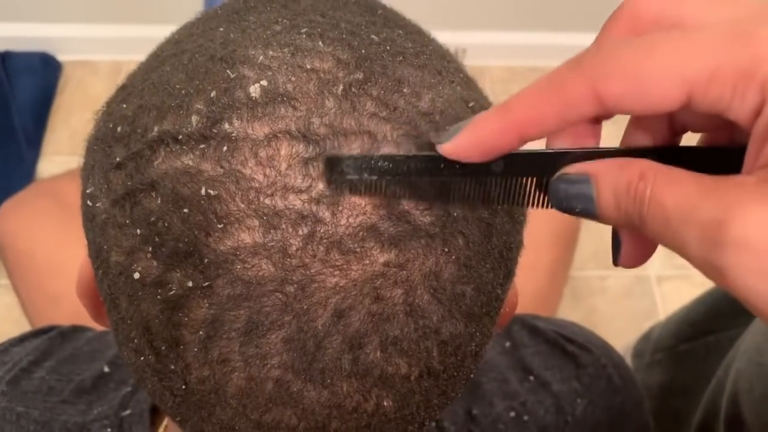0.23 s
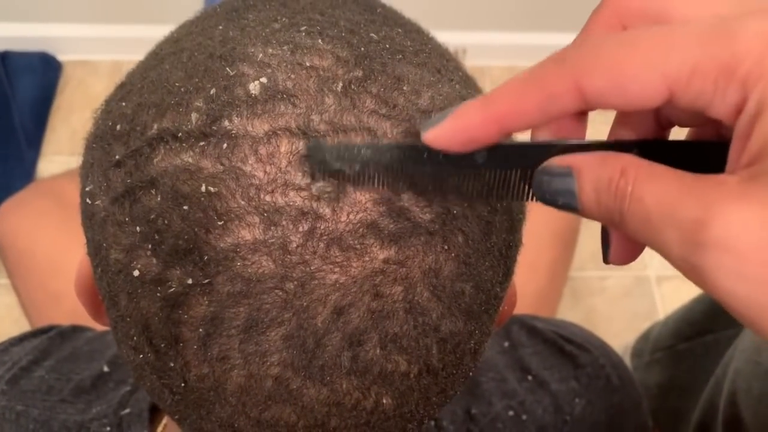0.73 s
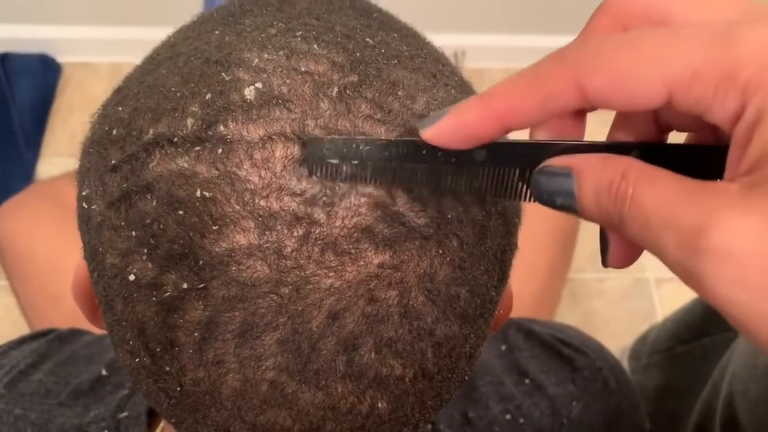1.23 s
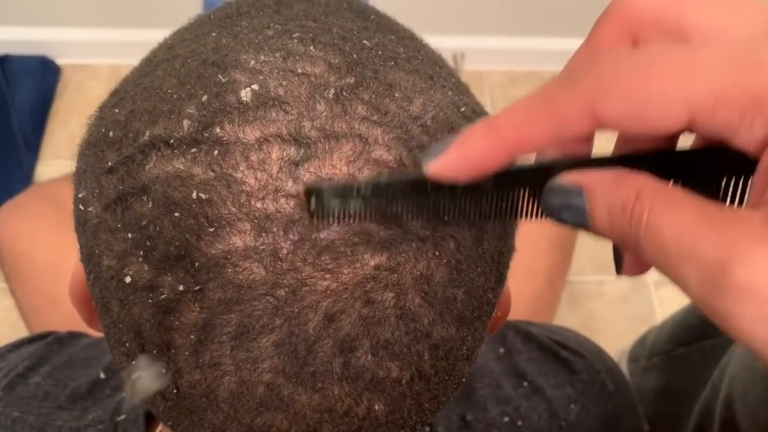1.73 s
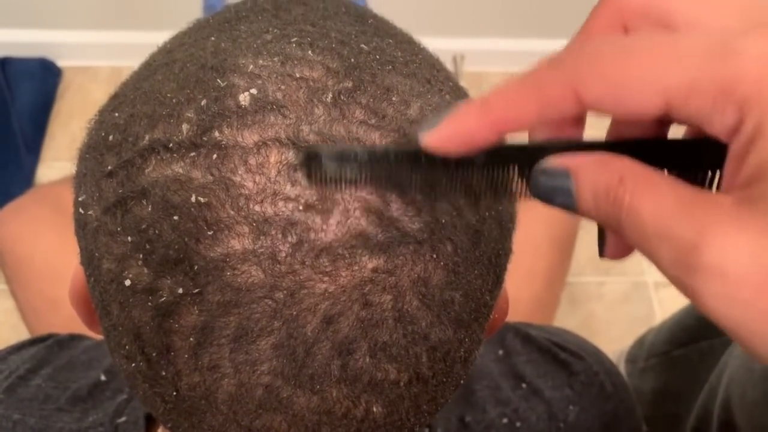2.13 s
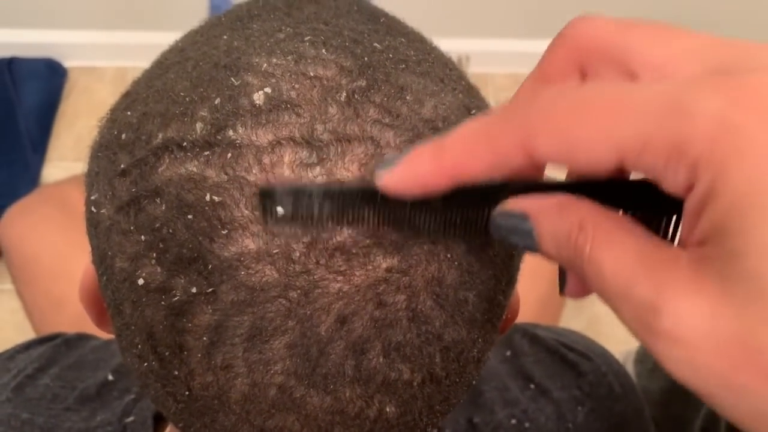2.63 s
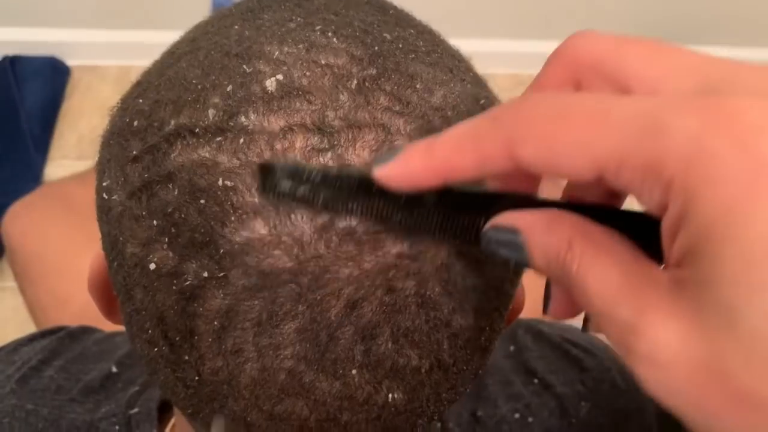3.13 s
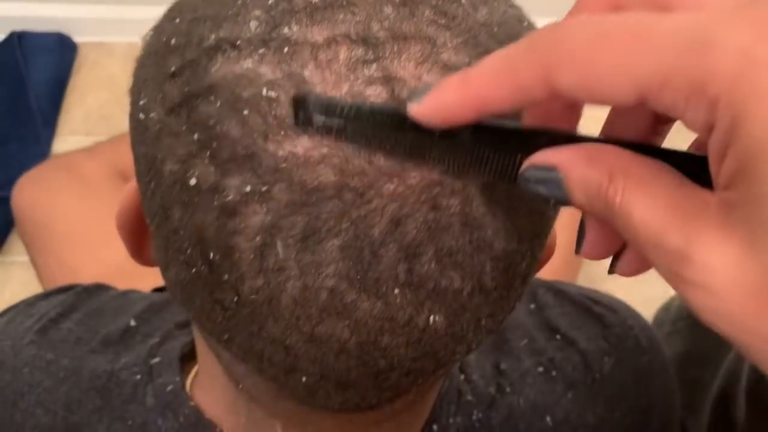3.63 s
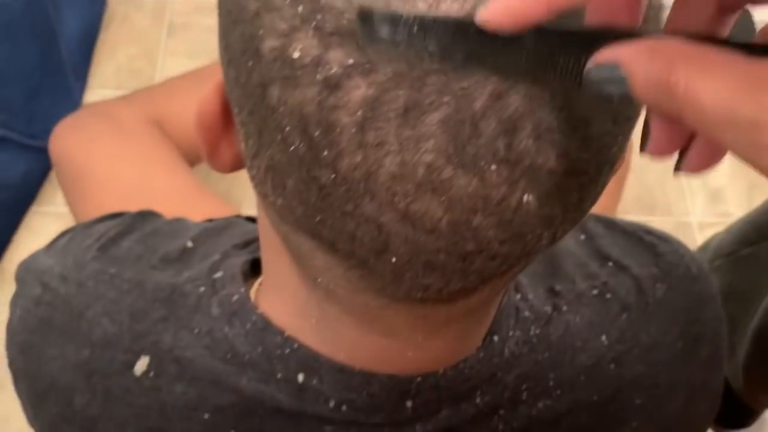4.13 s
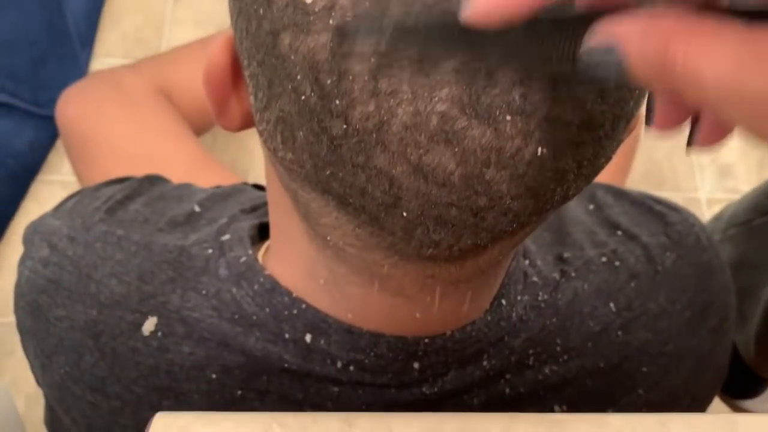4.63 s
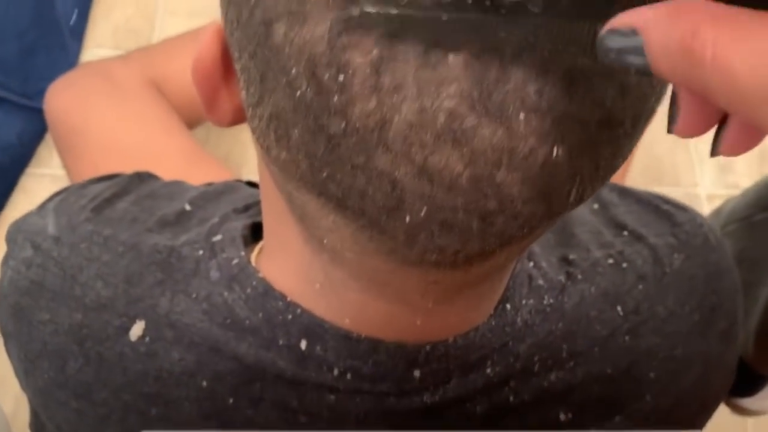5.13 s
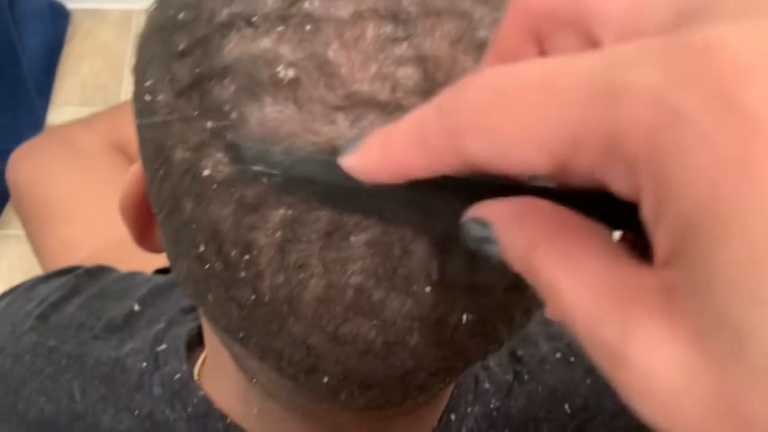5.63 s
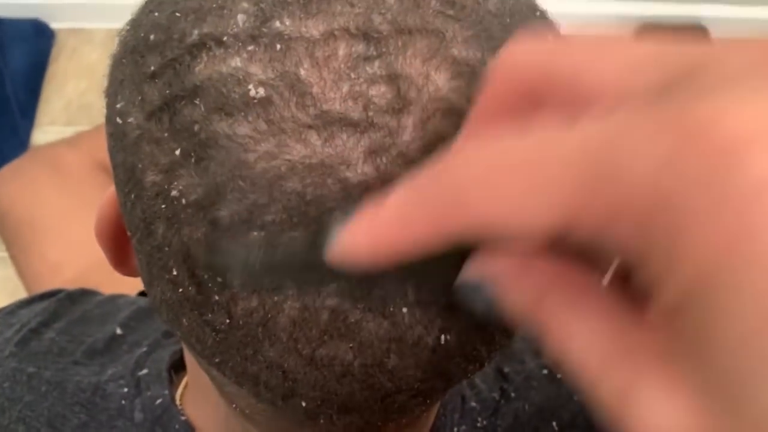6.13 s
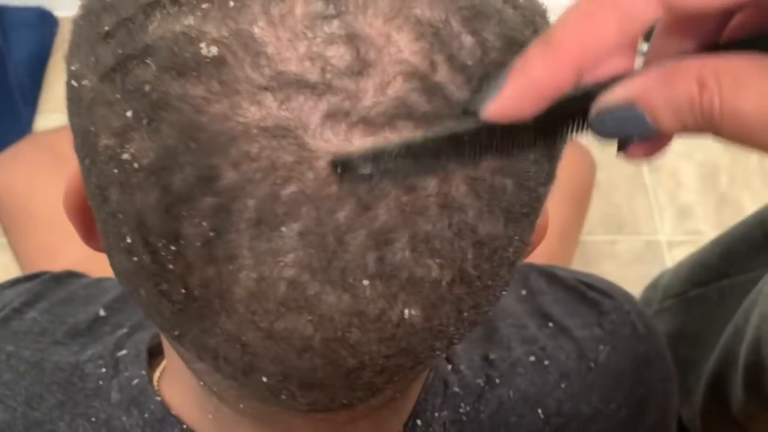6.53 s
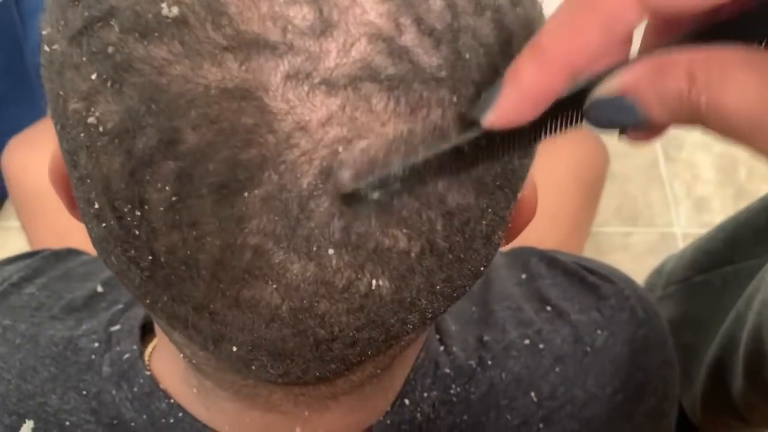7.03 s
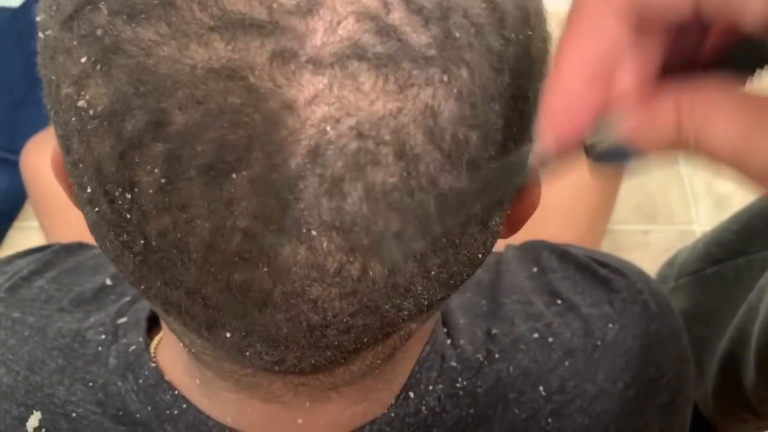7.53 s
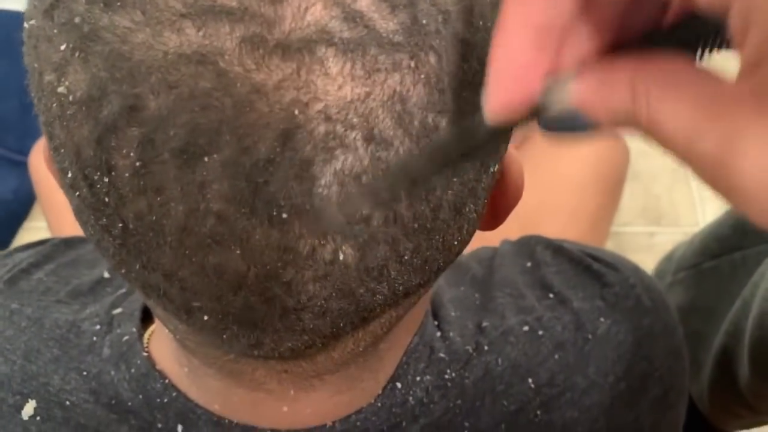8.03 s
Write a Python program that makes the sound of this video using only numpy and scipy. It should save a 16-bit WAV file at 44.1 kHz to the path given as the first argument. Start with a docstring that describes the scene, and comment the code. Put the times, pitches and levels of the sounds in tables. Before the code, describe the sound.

Indoors, a deep steady ventilation rumble with faint hiss lies under a very close, dry stereo pickup of a plastic fine-tooth comb in short coily hair. From 0 to 0.9 s the comb makes faint, light flicks with tiny ticks. Between 0.9 and 1.6 s these gather into sharp, snappy crackling as coils catch, with a dull finger knock on the microphone near 1.3 s. After a short lull, strokes resume at 1.9 s, and from 2.2 s become brisk, thin rasps, each about a tenth of a second, made of dense bright clicks. Soft hollow knocks cluster at 3.3 to 3.5 s. Cloth swishes faintly around 4.5 s; small dull scrapes and hard ticks come near 5.2 s. At 6.2 s a longer scratch mixes with soft cloth, then a knock at 6.4 s. Lighter, less ticky strokes continue, more spaced, until about 8.2 s.

```python
"""A plastic fine-tooth comb scratches in quick strokes through dry hair, close to a hand-held two-port microphone.
Hairs slip off the teeth as dense tiny clicks that ring modes of comb and scalp; catches and sharp ticks stand out.
Fingers knock softly on the microphone body as swelling, sagging tones; short dull scrapes and cloth swishes
are shaped noise. Behind them, ventilation rumbles through low room resonances under a faint hiss."""
import sys
import numpy as np
from scipy import signal
from scipy.fft import rfft, irfft, next_fast_len
from scipy.io import wavfile

SR = 44100
rng = np.random.default_rng(int(sys.argv[2]) if len(sys.argv) > 2 else 0)


def int16_out(signal):
    """Quantize to a 16-bit WAV file."""
    q = np.round(np.clip(np.atleast_2d(signal).T, -1, 1) * 32767)
    wavfile.write(sys.argv[1], SR, q.astype(np.int16))


N = 364707
LONG = next_fast_len(N + SR // 4)   # length with spare room for work on the spectrum
HZ = np.maximum(np.fft.rfftfreq(LONG, 1 / SR), 1)
CONTROL = np.arange(0, N + 32, 32) / SR   # times in s at which movements are worked out


def from_db(db):
    """Decibels to gain."""
    return 10 ** (np.asarray(db) / 20)


def rms_one(x):
    """Scale to rms 1."""
    return x / np.sqrt(np.mean(x ** 2) + 1e-20)


def at_hz(points):
    """Second column of a table, read over log frequency."""
    points = np.array(points)
    return np.interp(np.log(HZ), np.log(points[:, 0]), points[:, 1])


def drift(rate_hz):
    """Slow chance: noise at every 32nd sample through a double one-pole low-pass; spread 1."""
    r = np.exp(-64 * np.pi * rate_hz / SR)
    raw = rng.standard_normal(N // 32 + 2002)
    slow = signal.lfilter([1], [1, -2 * r, r * r], raw)[2000:]   # the run-in is dropped
    return np.interp(np.arange(N) / 32, np.arange(len(slow)), rms_one(slow))


def noise(gain):
    """Two unrelated noises with the given gain per frequency; rms 1."""
    spectrum = rfft(rng.standard_normal((2, LONG))) * gain
    return rms_one(irfft(spectrum, LONG)[:, :N])


def every_sample(control):
    """A movement filled in between its control times."""
    return np.interp(np.arange(N) / SR, CONTROL, control)


def gesture(start_s, length_s, first_db, last_db, in_db_per_s, out_db_per_s):
    """Level in dB of one movement (ramp in, straight run, ramp out) and its progress 0-1."""
    t = CONTROL - start_s
    progress = np.clip(t / max(length_s, .005), 0, 1)
    ramps = in_db_per_s * np.maximum(-t, 0) + out_db_per_s * np.maximum(t - length_s, 0)
    return first_db + (last_db - first_db) * progress - ramps, progress


def resonate(x, modes, colour_db):
    """Parallel resonances with alternating signs; each one's share wanders as the contact moves."""
    out = 0
    for k, (hz, width_hz, level_db) in enumerate(modes):
        r = np.exp(-np.pi * width_hz / SR)
        sign = (-1) ** k
        b = np.array([1, 0, -1]) * (1 - r * r) / 2 * from_db(level_db) * sign
        a = [1, -2 * r * np.cos(2 * np.pi * hz / SR), r * r]
        ringing = signal.lfilter(b, a, x + 1e-18)
        out = out + ringing * from_db(colour_db * drift(12))
    return out


def comb():
    """Hairs slip off in clumps, coils catch with harder ticks, single sharp ticks crack; all ring the comb."""
    # Single sharp ticks, loud and faint, of hair or plastic. Each row: time in seconds,
    # strength in relative dB, low modes against the high ones in relative dB.
    sharp_ticks = [(.0253, -64, -22), (.0302, -59, -20), (.076, -63, -15), (.1818, -60, -25),
                   (.3987, -61, -22), (.5736, -52, -12), (.5786, -52, -10), (.6884, -63, -25),
                   (.6986, -64, -20), (.8517, -58, -27), (.8773, -61, -27), (.9243, -47.5, -22),
                   (.993, -61, -25), (1.0162, -58, -25), (1.0385, -47, -34), (1.0615, -56, -30),
                   (1.0723, -56, -30), (1.086, -49, -28), (1.0938, -59, -28), (1.1225, -53, -27),
                   (1.1458, -48.5, -32), (1.1535, -47, -30), (1.2448, -53, -20), (1.2533, -55, -24),
                   (1.2894, -47, -32), (1.2996, -49, -33), (1.3192, -57, -30), (1.3365, -57, -30),
                   (1.3412, -56, -28), (1.3525, -45, -36), (1.3624, -58, -30), (1.3957, -52, -31),
                   (1.4049, -52, -30), (1.4214, -54, -29), (1.5763, -49, -30), (1.593, -50, -14),
                   (1.9734, -51, -25), (1.9987, -60, -26), (2.2129, -58, -17), (2.2162, -55, -5),
                   (2.6376, -63, -22), (2.9251, -61, -23), (2.9432, -50, -26), (3.3372, -59, -19),
                   (3.4609, -50, -31), (3.6072, -55, -9), (3.8909, -50, -24), (4.135, -61, -23),
                   (4.3005, -54, -7), (4.5964, -49, -16), (4.7602, -55, -18), (5.199, -64, -16),
                   (5.2006, -56, -14), (5.2238, -59, -14), (5.2254, -49, -9), (5.2666, -53, -13),
                   (5.28, -47.5, -5), (5.5278, -48, -22), (5.7558, -56, -22), (5.8265, -50, -25),
                   (6.6121, -63, -20)]
    # Modes of the comb teeth. Each row: pitch in Hz, width in Hz, level in relative dB.
    tooth_modes = [(7370, 3600, -13), (8770, 750, -1), (9640, 800, -4.5), (10210, 720, 1),
                   (12210, 2370, 1.5), (12990, 1440, 4.5), (14800, 1500, 1), (15300, 720, -3.5)]
    # Modes of the comb back and scalp. Each row: pitch in Hz, width in Hz, level in relative dB.
    back_modes = [(3570, 1270, -7.5), (4324, 1030, 1), (5160, 590, 0.5), (6210, 740, 0)]
    # Coils catch often in the first light flicks, seldom in the firmer strokes.
    # Each row: time in seconds, catches per second.
    catch_rate = [(0, 260), (1.6, 260), (2.0, 90), (5.9, 90), (6.3, 40), (8.3, 40)]
    slips_per_s, slip_spread_db = 7400, 1
    clump_db, burst_db, bursts_hz = 1, 1.1, 60   # the teeth grip and let go unevenly within a stroke
    catch_db, catch_spread_db = 13, 3
    crack_band_hz, crack_db, tick_ring_db = [9200, 15700], 11.5, 9
    root_follows = 0.3   # share of the scalp contact that reaches the four lowest tooth modes
    colour_db = 1.7   # how far each mode's share wanders

    high, low = strokes()
    spread = np.minimum(rng.exponential(1, (2, N)), 5)
    sizes = from_db(slip_spread_db * spread) * rng.choice([-1, 1], (2, N))
    slipping = rng.random((2, N)) < slips_per_s / SR
    unevenness = from_db(clump_db * drift(130) + burst_db * drift(bursts_hz))
    slips = rms_one(sizes * slipping * unevenness)

    catching = rng.random(N) < np.interp(np.arange(N) / SR, *np.transpose(catch_rate)) / SR
    strength = from_db(catch_db + catch_spread_db * np.minimum(rng.exponential(1, N), 3))
    catches = catching * strength * rng.choice([-1, 1], (2, N))

    teeth = from_db(8.5) * high * slips
    back = from_db(12.0) * low * (slips + .5 * catches)
    ticks = from_db(-8.0) * high * catches   # catches crack too
    tick_signs = rng.choice([-1, 1], (len(sharp_ticks), 2))
    for (s, strength_db, low_db), signs in zip(sharp_ticks, tick_signs):
        ticks[:, round(s * SR)] += signs * from_db(strength_db)
        back[:, round(s * SR)] += signs * from_db(strength_db + low_db + 18)

    band = signal.butter(3, crack_band_hz, "band", fs=SR, output="sos")
    crack = from_db(crack_db) * signal.sosfilt(band, ticks)
    roots = teeth * from_db(5.0) * (low / high) ** root_follows
    tick_drive = from_db(tick_ring_db) * ticks
    root_ring = resonate(roots + tick_drive, tooth_modes[:4], colour_db)
    tooth_ring = resonate(teeth + tick_drive, tooth_modes[4:], colour_db)
    return crack + root_ring + tooth_ring + resonate(back, back_modes, colour_db)


def strokes():
    """How hard the strokes drive the teeth and the back of the comb, summed as power."""
    # Comb strokes, the faintest being the slide back. Each row: teeth touch in seconds, length in seconds,
    # scratch at touch in relative dB, scratch at lift in relative dB,
    # scalp contact as low modes against the high ones in relative dB.
    comb_strokes = [(0.031, 0.056, -82.5, -93, -8), (0.14, 0.154, -79, -100, -13),
                    (0.356, 0.12, -78, -98, -6.5), (0.585, 0.043, -71.5, -89, -13.5),
                    (0.688, 0.029, -80, -90.0, -16), (0.8, 0.096, -80, -84, -17),
                    (0.894, 0.048, -82.5, -78, -17), (1.008, 0.017, -74, -76, -19),
                    (1.042, 0.04, -69, -76, -30), (1.092, 0.061, -82, -63.5, -19),
                    (1.262, 0.078, -64, -81, -25), (1.351, 0.084, -71, -90, -25),
                    (1.4, 0.113, -66, -93, -23), (1.505, 0.094, -74, -66, -16.5),
                    (1.938, 0.068, -79, -73, -13.5), (2.219, 0.11, -68.5, -84.5, -12.0),
                    (2.463, 0.084, -72.5, -69.5, -10), (2.684, 0.035, -83, -75, -11),
                    (2.74, 0.088, -65.5, -92, -13.5), (2.904, 0.1, -75.5, -57, -14.5),
                    (3.053, 0.064, -93, -82, -2.5), (3.151, 0.075, -73.5, -66, -10.5),
                    (3.267, 0.091, -88, -85, -6.5), (3.386, 0.082, -71, -66.5, -14),
                    (3.507, 0.12, -88, -83, -7), (3.619, 0.049, -67, -61, -13),
                    (3.799, 0.085, -93, -64, -12), (4.059, 0.075, -72, -72.5, -11),
                    (4.18, 0.089, -80, -97, -8), (4.311, 0.11, -65, -83.5, -13.5),
                    (4.42, 0.13, -86, -89, -14), (4.527, 0.068, -78, -60, -7.5),
                    (4.64, 0.051, -85, -88, -4), (4.701, 0.14, -93.5, -59.5, -8.5),
                    (4.942, 0.14, -85.5, -62, -13), (5.22, 0.018, -77, -92, -2.5),
                    (5.252, 0.1, -73, -70.5, -13), (5.393, 0.054, -85, -88, -11),
                    (5.515, 0.09, -67, -69, -14.5), (5.62, 0.072, -86, -91, -8),
                    (5.74, 0.085, -75.5, -61.5, -12.5), (5.85, 0.042, -82, -92, -8),
                    (5.991, 0.025, -69, -74, -14.5), (6.199, 0.16, -73, -77, -5.5),
                    (6.44, 0.1, -71, -74, -9.5), (6.56, 0.07, -83, -83, -10),
                    (6.642, 0.098, -79, -68.5, -14.5), (6.799, 0.072, -84, -87.0, -13),
                    (6.898, 0.093, -74.5, -76, -17.0), (7.139, 0.07, -78.5, -67.5, -12.5),
                    (7.273, 0.053, -80, -88.5, -15), (7.333, 0.1, -91, -69, -11.5),
                    (7.527, 0.049, -74.5, -87, -14), (7.615, 0.089, -83.5, -72, -20),
                    (7.867, 0.071, -78, -91, -19), (8.108, 0.064, -70, -83, -18)]
    touch_db_per_s, lift_db_per_s, mid_stroke_db = 560, 950, 3.5   # setting in, stopping, swell midway
    contact_eases_db = 6   # the teeth press the scalp less from touch to lift
    resting_db, resting_contact_db = -91, -11   # the comb lying in the hair between strokes

    high = from_db(resting_db) ** 2
    low = from_db(resting_db + resting_contact_db) ** 2
    for s, length_s, touch_db, lift_db, contact_db in comb_strokes:
        level_db, progress = gesture(s, length_s, touch_db, lift_db, touch_db_per_s, lift_db_per_s)
        swell_db = mid_stroke_db * 4 * progress * (1 - progress)
        power = from_db(level_db + swell_db) ** 2
        high = high + power
        low = low + power * from_db(contact_db + contact_eases_db * (.5 - progress)) ** 2
    return every_sample(np.sqrt(high)), every_sample(np.sqrt(low))


def knocks():
    """A small click as the finger lets go, then each body mode swells, sags in pitch and dies."""
    # Finger knocks. Each row: time in seconds, level in relative dB, nominal pitch in Hz,
    # relative ring length in cycles, click level in relative dB.
    finger_knocks = [(1.274, -47.5, 496, 7.5, -65), (1.554, -67.5, 500, 9.5, -95),
                     (3.012, -76, 507, 22, -99), (3.270, -55, 573, 8, -72), (3.338, -64, 506, 6.5, -95),
                     (3.421, -47, 467, 5, -65), (3.443, -57, 496, 7, -90), (3.514, -68, 520, 15, -95),
                     (4.006, -60, 475, 7.5, -90), (4.281, -70, 607, 13, -99), (4.684, -58, 495, 11.5, -90),
                     (5.333, -69, 482, 14, -99), (5.578, -71, 432, 10, -99), (6.377, -52.5, 503, 8.5, -89)]
    # Modes of the microphone body. Each row: ratio to the knock's pitch, level in relative dB.
    body_modes = [(0.599, 0.5), (1, 4.9)]
    click_hz, click_s, click_lead_s = 1750, 0.00056, .0017
    swell_power, pitch_sag = 2.3, 0.11

    out = np.zeros(N + SR)
    t = np.arange(SR // 8) / SR
    click = t / click_s * np.exp(1 - t / click_s) * np.sin(2 * np.pi * click_hz * t)
    for s, level_db, hz, cycles, click_db in finger_knocks:
        out[round((s - click_lead_s) * SR):][:len(t)] += from_db(click_db) * click
        for ratio, mode_db in body_modes:
            u = t * hz * ratio / cycles * np.log(1000) * 1.77   # time in decay constants
            sagging_hz = hz * ratio * (1 + pitch_sag * (np.exp(-u / 2) - .3))
            turns = np.cumsum(sagging_hz) / SR
            swell = (np.e * u / swell_power) ** swell_power * np.exp(-u)   # peaks at 1
            ring = swell * np.sin(2 * np.pi * turns)
            out[round(s * SR):][:len(t)] += from_db(level_db + mode_db) * ring
    return out[:N] * np.array([[1], [.8]])   # common part, differing part


def scrapes():
    """A brief dull puff of friction noise in one broad resonance, quick to rise and dying away."""
    # Each row: start in seconds, level in dB before the decay, centre in Hz, width in Hz, decay in seconds.
    dull_scrapes = [(2.214, -78, 1380, 500, 0.017), (4.63, -76, 1440, 400, .02),
                    (5.184, -65, 815, 302, 0.0055), (5.261, -63.5, 840, 342, 0.0057),
                    (5.829, -67.5, 2010, 480, 0.018), (6.2, -76.5, 764, 250, 0.088),
                    (7.683, -75.5, 1500, 1200, 0.037)]
    out = np.zeros((2, N + SR))
    t = np.arange(SR // 4) / SR
    for s, level_db, hz, width_hz, decay_s in dull_scrapes:
        edges_hz = [hz - width_hz / 2, hz + width_hz / 2]
        band = signal.butter(2, edges_hz, "band", fs=SR, output="sos")
        puff = rms_one(signal.sosfilt(band, rng.standard_normal((2, len(t)))))
        envelope = np.exp(-t / decay_s) * np.minimum(t / 0.0013, 1)
        out[:, round(s * SR):][:, :len(t)] += from_db(level_db) * puff * envelope
    return out[:, :N]


def cloth():
    """Cloth swishes now and then: broad soft noise, slightly uneven, follows the loudest movement."""
    # Each row: start in seconds, length in seconds, level at start in relative dB, level at end in relative dB.
    swishes = [(4.303, .1, -90.5, -92), (4.442, 0.17, -83.5, -78), (6.201, 0.38, -81, -97.5),
               (7.69, .02, -89.5, -96)]
    # Spectrum of the cloth. Each row: frequency in Hz, density in relative dB per Hz.
    cloth_spectrum = [(500, 2), (800, -4.5), (1500, -2.5), (1900, -4), (2500, 1), (3200, -3), (4500, -5.5),
                      (7000, -7), (12000, -16.5)]
    in_db_per_s, out_db_per_s = 135, 106
    levels_db = [gesture(*row, in_db_per_s, out_db_per_s)[0] for row in swishes]
    level_db = every_sample(np.max(levels_db, axis=0))
    return from_db(level_db + 7.5 + 2.0 * drift(33)) * noise(from_db(at_hz(cloth_spectrum)))


def ventilation():
    """Air rumble lifted at the room's low resonances; each band swells slowly on its own."""
    # Spectrum of the rumble. Each row: frequency in Hz, density in relative dB per Hz.
    rumble_spectrum = [(20, -25.5), (30, -18), (41, -11), (48, -1), (60, 1), (125, -0.5), (181, -7),
                       (215, -18), (255, -14), (295, -21), (348, -26.5), (398, -35), (528, -42.5),
                       (700, -47.5), (1000, -60), (2000, -108.5)]
    # Room resonances that the rumble excites. Each row: pitch in Hz, width in Hz, lift in dB.
    room_modes = [(50.6, 4.9, 10), (87.3, 10, 4.5), (116.3, 4.9, 3), (138, 11, 3), (179.6, 16, 3),
                  (241, 12, 4.5), (267.3, 16, 3.5), (332.7, 12, 3.5), (358, 21, 6.5)]
    rumble_db, waver_db, split_hz = -47, 1.5, [70, 105, 160, 220, 310]

    lift_db = sum(db / (1 + (2 * (HZ - hz) / width_hz) ** 2) for hz, width_hz, db in room_modes)
    air = rfft(rng.standard_normal((2, LONG))) * from_db(at_hz(rumble_spectrum) + lift_db)
    band = np.searchsorted(split_hz, HZ)
    rumble = 0
    for k in range(len(split_hz) + 1):
        part = irfft(air * (band == k), LONG)[:, :N]
        rumble = rumble + from_db(waver_db * drift(1.2)) * part
    return from_db(rumble_db) * rms_one(rumble)


def hiss():
    """A faint background hiss: shaped noise whose level wavers slightly."""
    # Each row: frequency in Hz, density in relative dB per Hz.
    hiss_spectrum = [(400, 7), (700, 3), (1400, 1.5), (2800, -1), (6000, -6), (11000, -2), (14000, -11.5),
                     (15000, -32), (16000, -30)]
    return from_db(-80.5 + 0.4 * drift(3.3)) * noise(from_db(at_hz(hiss_spectrum)))


def scene():
    """Row 0 is the sound common to both channels, row 1 the part in which they differ."""
    return comb() + knocks() + scrapes() + cloth() + ventilation() + hiss()


def record(dry):
    """Each channel takes the common part plus or minus the rest, the left leading by a phase; the top is cut."""
    # Likeness of the left and right channels by frequency. Each row: frequency in Hz, likeness from 0 to 1.
    channel_likeness = [(30, .92), (52, .98), (67, .75), (100, .92), (260, .95), (500, .65), (1000, .1),
                        (2000, .1), (4300, .4), (5500, .25), (8300, .75), (9000, .98), (10100, .98),
                        (10350, .85), (11500, .65), (12500, .995), (13700, .995), (14600, .72), (16000, .8)]
    # Further lead of the left channel by frequency. Each row: frequency in Hz, lead in radians.
    extra_lead = [(50, -0.6), (67, 0.33), (300, 0.16), (600, .5), (1400, -1.1), (2800, 0), (3500, 0.94),
                  (4300, 2.5), (5500, 0), (13700, 0), (15000, -0.8)]
    left_lead_s = 155e-6   # underlying lead of the left channel
    phase_steps = .95   # 0-1, how far the left-right phase is drawn towards in-phase and opposite
    cutoff_hz = 15870

    margin = (LONG - N) // 2
    padding = ((0, 0), (margin, LONG - N - margin))
    run_in = np.pad(dry, padding, "reflect", reflect_type="odd")
    common, differing = rfft(run_in * signal.windows.tukey(LONG, 2 * margin / LONG))

    even_lead = 2 * np.pi * HZ * left_lead_s
    lead = even_lead - phase_steps * np.sin(2 * even_lead) / 2 + at_hz(extra_lead)
    half_lead = np.exp(.5j * lead)
    alike = np.clip(at_hz(channel_likeness), 0, 1)
    common = common * np.sqrt((1 + alike) / 2)
    differing = 1j * differing * np.sqrt((1 - alike) / 2)   # a quarter cycle off: both stay equally loud
    left, right = (common + differing) * half_lead, (common - differing) / half_lead
    channels = irfft([left, right], LONG)

    cut = signal.ellip(12, .5, 60, cutoff_hz, fs=SR, output="sos")
    fade = signal.windows.tukey(N, .016 * SR / N)   # 8 ms at each end
    return fade * signal.sosfilt(cut, channels)[:, margin:margin + N]


dry = scene()
out = record(dry)
int16_out(out)
```